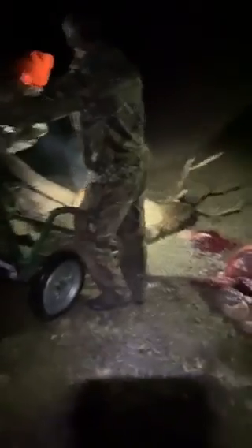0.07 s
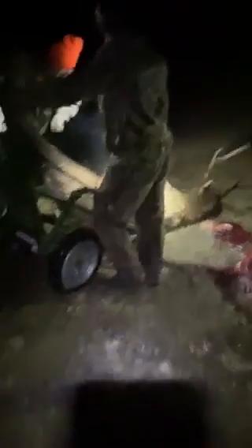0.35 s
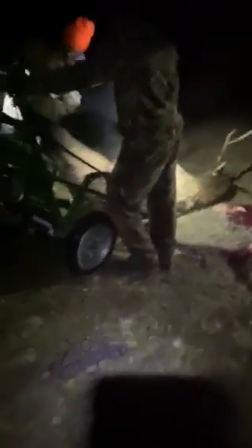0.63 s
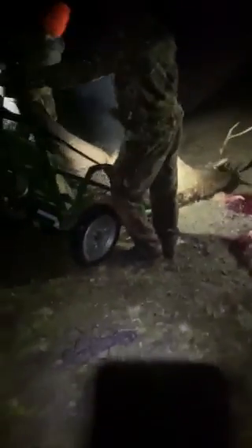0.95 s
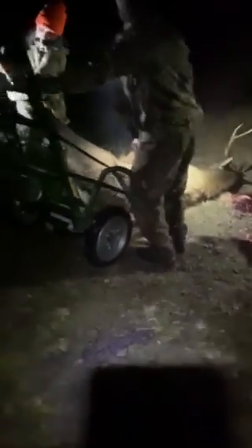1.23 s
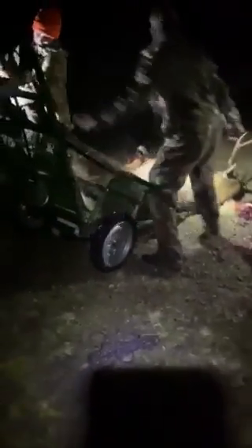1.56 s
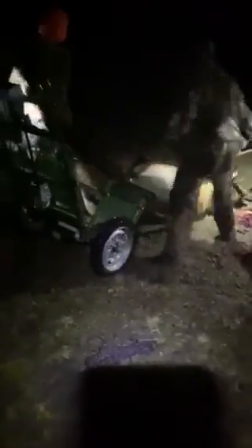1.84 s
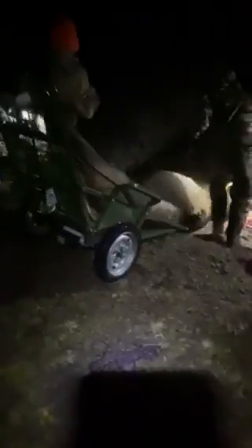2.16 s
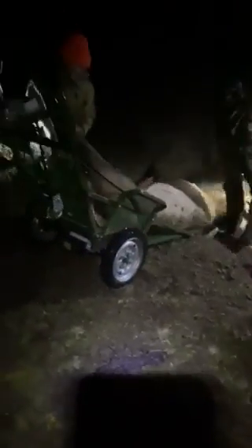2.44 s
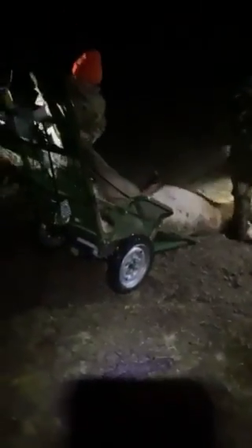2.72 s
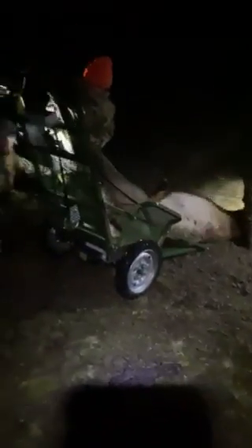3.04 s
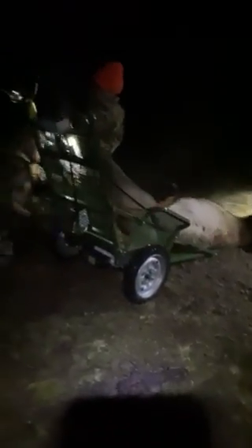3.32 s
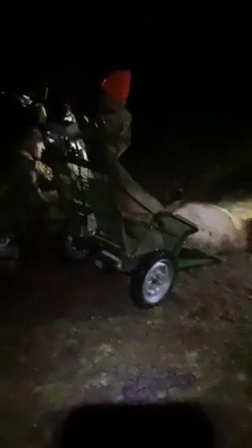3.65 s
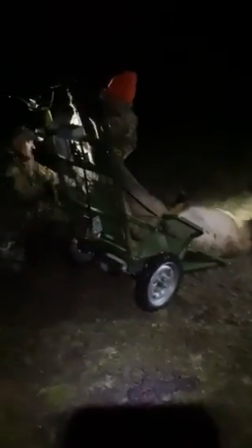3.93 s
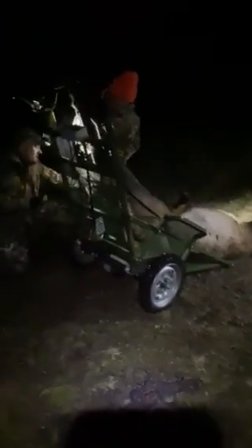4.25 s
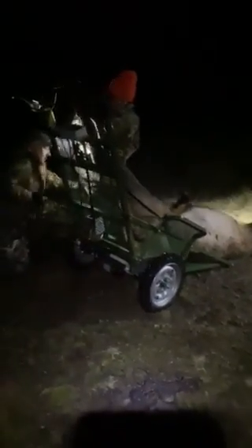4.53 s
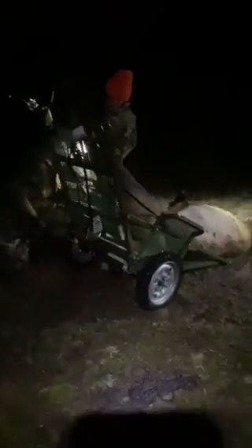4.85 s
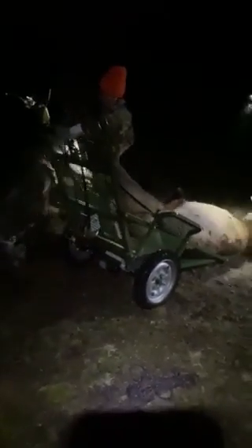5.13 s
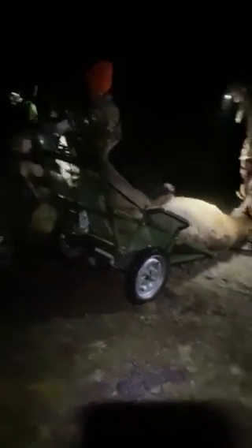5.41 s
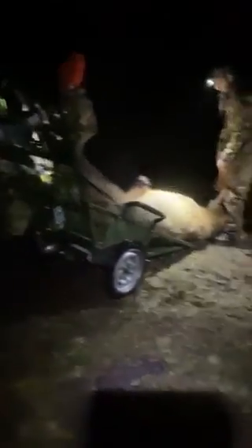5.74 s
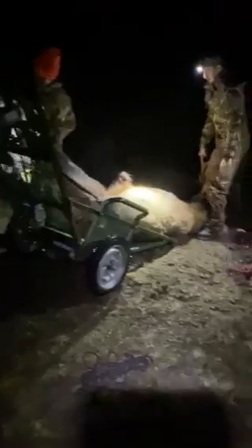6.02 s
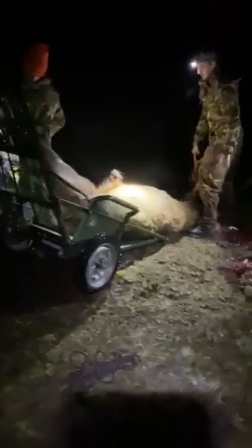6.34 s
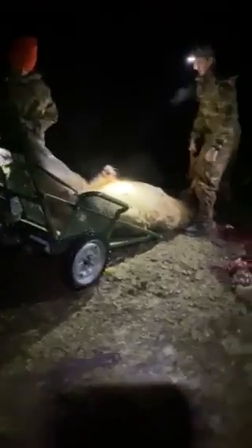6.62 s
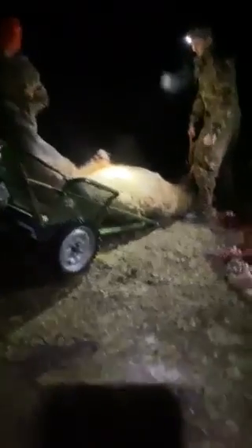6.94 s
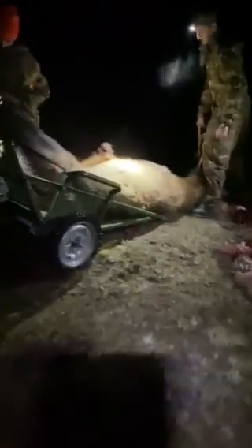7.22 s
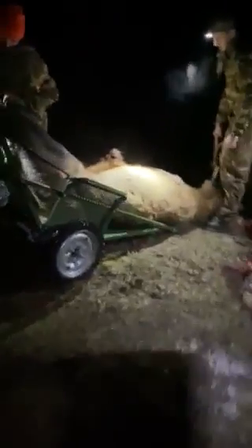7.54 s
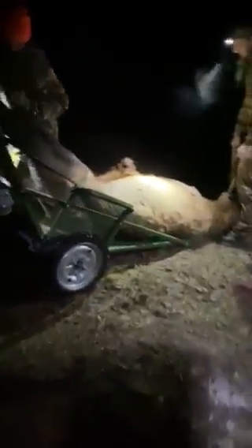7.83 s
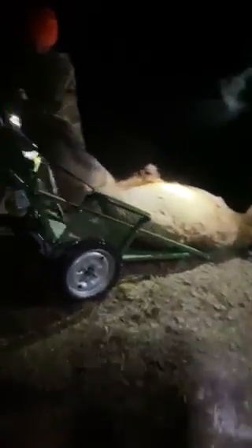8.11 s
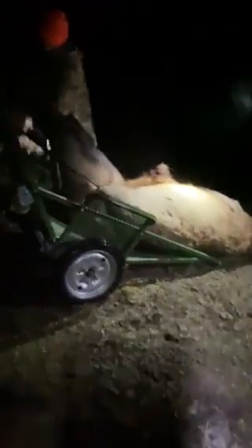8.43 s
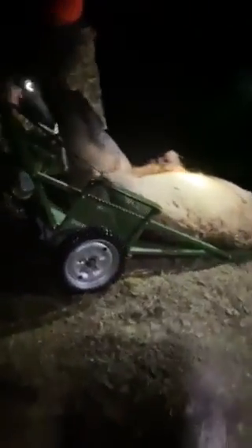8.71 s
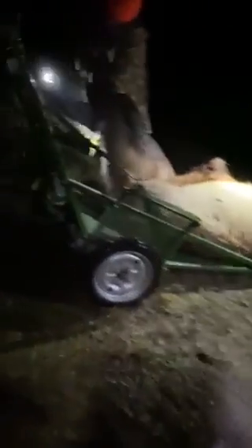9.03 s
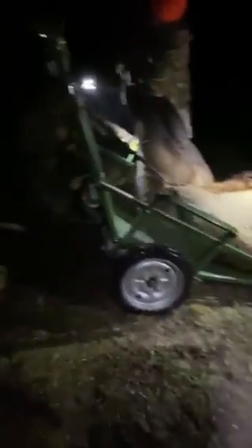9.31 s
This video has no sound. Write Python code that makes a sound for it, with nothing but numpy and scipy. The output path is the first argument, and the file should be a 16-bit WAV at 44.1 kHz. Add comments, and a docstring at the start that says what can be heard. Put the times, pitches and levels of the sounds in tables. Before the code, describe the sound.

A hand winch is cranked outdoors, its ratchet ticking and gears grinding, with a sharp, ringing steel clack on each turn.

```python
"""A hand winch on a steel loading frame hauls a heavy load off the dirt, outdoors at night.
Faint rumble and hiss run throughout; boots bump and scuff first. From 0.46 s come six crank turns.
Each starts with a pull: the pawl ticks over the ratchet while the gears grind and knock.
One hard clack sets the frame booming, then the crank swings back in quickening ticks.
In and between turns the cable creaks, the load shifts, and boots and load scuff the ground."""
import sys
import numpy as np
from scipy import signal
from scipy.io import wavfile
from scipy.ndimage import uniform_filter1d, map_coordinates

SR = 44100
rng = np.random.default_rng(int(sys.argv[2]) if len(sys.argv) > 2 else 0)


def store_pcm(level_fs):
    """Save levels as 16-bit WAV."""
    pcm = np.round(np.clip(level_fs, -1, 1) * 32767).astype(np.int16)
    wavfile.write(sys.argv[1], SR, np.atleast_2d(pcm).T)


N = 413216
TIME = np.arange(N) / SR
RING_TIME = TIME[:SR]
DRUM_DETUNE = .035  # relative pitch spread between contacts

# Steel frame modes: pitch_hz, level_db, t60_s
FRAME_MODES = [(168, -2.5, .3), (179.4, -6.5, 0.64), (194.2, -7.5, 0.97), (206.7, -1, 0.29),
               (224.6, -4.5, 0.18), (250.5, -4, 0.57), (284.6, -1, 0.33), (304, -1, 0.51), (335, -15, 0.38),
               (534, -20, 0.43), (659, -11.5, .32), (691, -9, 0.39), (716, -8.5, .3), (744, -17.5, 0.22),
               (830, 2.5, 0.24), (923, -14.5, 0.22), (981, 2.5, 0.06), (1060, -11, 0.11),
               (1156, -19.5, 0.51), (1216, -6, .18), (1269, 2.5, 0.13), (1480, -2.5, 0.14),
               (1615, -14.5, 0.29), (2074, -3, 0.12), (2182, 0.5, .1), (2341, 1, 0.14), (2580, -1, 0.11),
               (2560, -5.5, .12), (5770, -15, .13), (6100, -14.5, .13), (6850, -11, .08)]
# Gear wheel and drum modes: pitch_hz, level_db, t60_s
DRUM_MODES = [(653, -3.5, 0.1), (831, -5, 0.076), (1024, -2, .06), (1190, 1, 0.028), (1513, -4, 0.028),
              (1750, -6, .08), (2070, 5.5, 0.03), (2360, 0, 0.056), (2495, -9.5, .06), (3626, -4, 0.04),
              (4090, -8.5, 0.062)]
# Noise spectra: freq_hz, density_db
RUMBLE_SPECTRUM = [(20, -46.5), (45, 0.5), (75, 3), (130, -2), (230, 2.5), (400, -15), (700, -11.5),
                   (1300, -38), (3000, -48.5)]
HISS_SPECTRUM = [(300, 6), (1000, 0.5), (2200, 4.5), (3500, -0.5), (4700, 5.5), (6000, 3.5), (8000, -2.5),
                 (11000, 0), (12500, -10), (14000, -32.5)]
GRIND_SPECTRUM = [(80, -21.5), (175, 3), (260, 7), (480, 3), (750, 3), (1020, 2), (1650, -3), (2250, -2.5),
                  (2900, -9), (3700, -10), (4800, -6.5), (6200, -10.5), (10500, -14.5), (14000, -60.5)]
KNOCK_SPECTRUM = [(150, 4.5), (400, -1.5), (700, -1), (1000, -0.5), (1600, -10), (2200, -10.5),
                  (3000, -11.5), (6000, -17.5), (12000, -42)]
# Knock ring-out: freq_hz, t60_s
KNOCK_DECAY = [(200, 0.38), (1000, 0.52), (6000, 0.09)]
# Pull up to speed: start_s, tooth_count, first_gap_s, full_speed_gap_s
PULL_TIMES = [(.4575, 5, .079, .0615), (1.9737, 4, .0773, .057), (3.1855, 5, .104, .065),
              (4.8195, 2, .0795, .079), (6.511, 3, .0721, .071), (8.2259, 3, .0777, .09)]
# Pull force: first_tick_db, later_tick_db, knock_db, clunk_db, clunk_hz, plate_db, build_s,
# grind_db, rasp_db
PULL_LEVELS = [(-44, -28.5, -44.5, -49.5, 260, -41, 0.042, -48.5, -49.5),
               (-30.5, -26, -37.5, -47.5, 470, -41, 0.043, -46, -55),
               (-40, -29.5, -38.5, -55, 420, -42, 0.2, -53, -60),
               (-31.5, -29.5, -42.5, -62, 140, -44, 0.11, -66, -62),
               (-34.5, -30, -39.5, -62, 174, -42, 0.085, -56, -55.5),
               (-37, -34, -45, -50, 170, -40, 0.023, -54.5, -58)]
# Clack ending each pull: start_s, crack_db, boom_db, clang_db, jolt_hz
CLACK_HITS = [(0.792, -13.5, -24.5, -24.5, 244), (2.2381, -15, -25.5, -26, 238),
              (3.546, -14.5, -25, -24.5, 284), (5.2045, -23, -31.5, -33, 283), (6.83, -24, -32, -35.5, 292),
              (8.5819, -27.5, -32, -36.5, 265)]
# Swing back: start_s, tooth_count, first_gap_s, gap_loss_per_tooth_s
SWING_TIMES = [(1.0547, 4, .1144, .0215), (2.3782, 5, .1354, .0247), (3.6425, 4, .1435, .022),
               (5.4254, 4, .124, .0221), (6.9875, 5, .1297, .0224), (8.7745, 4, .1255, .0255)]
# Swing force: first_tick_db, last_tick_db, last_knock_db, last_clunk_db, clunk_hz, first_plate_db,
# last_plate_db, grind_db, rasp_db
SWING_LEVELS = [(-36.5, -25.5, -45.5, -65, 720, -44.5, -39, -48, -59),
                (-39.5, -27.5, -34, -32.5, 186.5, -42.5, -37.5, -49.5, -57.5),
                (-38, -34, -38, -44.5, 1007, -49, -42.5, -54.5, -58.5),
                (-44.5, -28.5, -34, -38.5, 1010, -43.5, -45, -59, -57.5),
                (-43.5, -30.5, -62, -45, 130, -41.5, -43, -51, -54.5),
                (-43, -27, -35, -35, 200, -41, -40, -55.5, -55.5)]


def from_db(db):
    """Decibels to gain."""
    return 10 ** (np.asarray(db) / 20)


def rms_one(x):
    """Scale to rms 1."""
    return x / np.sqrt(np.mean(x ** 2) + 1e-20)


def unit_blow(x):
    """Scale to the energy of 10 ms at rms 1."""
    return rms_one(x) * np.sqrt(.01 * SR / x.shape[-1])


def in_time(rows):
    """Level curves, sample by sample."""
    times_s, *columns = np.transpose(rows)
    return [np.interp(TIME, times_s, column) for column in columns]


def at_hz(points, hz):
    """Read a table on a log-frequency axis."""
    freqs_hz, values = np.transpose(points)
    return np.interp(np.log(hz), np.log(freqs_hz), values)


def add(out, start_s, level_db, sound):
    """Mix a sound in."""
    start = max(0, round(start_s * SR))
    out[:, start:start + sound.shape[-1]] += from_db(level_db) * sound[..., :N - start]


def flutter(rate_hz):
    """Random wavering, mostly slower than rate_hz; rms 1."""
    return rms_one(uniform_filter1d(rng.standard_normal(N), size=SR // rate_hz))


def sides(hz):
    """Left and right gains at a frequency."""
    # Stereo balance: freq_hz, left_minus_right_db
    balance = [(40, -.5), (150, -2.6), (500, -3.5), (1000, -2), (2200, -2.6), (5000, -1), (9000, 0)]
    return from_db(at_hz(balance, hz) * np.array([[.5], [-.5]]))


def noise_bands(spectrum, size):
    """Yield (centre_hz, band): third octaves of stereo noise under a spectrum."""
    # Left-right likeness: freq_hz, correlation
    likeness = [(60, .96), (200, .995), (1400, .97), (3100, .62), (7000, .85), (12000, .92)]
    edges_hz = 22 * 2 ** (np.arange(30) / 3)
    white = rng.standard_normal((2, 2, size + 2000))
    for k, (low_hz, high_hz) in enumerate(zip(edges_hz, edges_hz[1:])):
        hz = np.sqrt(low_hz * high_hz)
        if spectrum[0][0] / 2 < hz < spectrum[-1][0] * np.sqrt(2):
            bandpass = signal.butter(2, [low_hz, high_hz], "band", fs=SR, output="sos")
            mid, side = signal.sosfilt(bandpass, white[k % 2])[:, -size:]
            alike = at_hz(likeness, hz)
            pair = np.sqrt(1 + alike) * mid + np.sqrt(1 - alike) * side * [[1], [-1]]
            yield hz, pair * sides(hz) * from_db(at_hz(spectrum, hz))


def colour(spectrum):
    """Steady stereo noise, rms 1."""
    return rms_one(sum(band for _, band in noise_bands(spectrum, N)))


def burst(spectrum, decay, rise_s, late_cycles, tail_db, tail_s, uneven_db=0):
    """Dense modes dying band by band; lows arrive later, a weak scattered tail follows."""
    t, out = TIME[:SR // 3], 0
    for hz, band in noise_bands(spectrum, len(t)):
        age_s = np.maximum(t - late_cycles / hz, 0)
        rise = np.minimum(age_s / rise_s, 1)
        fall = from_db(-60 * age_s / at_hz(decay, hz)) + from_db(tail_db - 60 * age_s / tail_s)
        out = out + band * rise * fall * from_db(uneven_db * rng.standard_normal())
    return unit_blow(out)


def ring(modes, rise_s, scatter_db, detune=0):
    """Struck modes, neighbours in opposite phase; no two blows hit the same spot."""
    t, out = RING_TIME[RING_TIME < 2 * max(t60_s for *_, t60_s in modes)], 0
    for k, (hz, level_db, t60_s) in enumerate(modes):
        strength = (-1) ** k * from_db(level_db + scatter_db * rng.standard_normal())
        hz = hz * np.exp(detune * rng.standard_normal())
        out = out + strength * sides(hz) * np.sin(2 * np.pi * hz * t) * from_db(-60 * t / t60_s)
    return unit_blow(out * np.minimum(t / rise_s, 1))


def note(hz, swell_s):
    """Heavily damped tone, peaking at swell_s."""
    t = RING_TIME[RING_TIME < 20 * swell_s]
    return sides(hz) * t / swell_s * np.exp(1 - t / swell_s) * np.sin(2 * np.pi * hz * t)


def softened(blow, cutoff_hz):
    """A gentler contact lasts longer and loses treble."""
    pole = np.exp(-2 * np.pi * cutoff_hz / SR)
    return unit_blow(signal.lfilter([1], [1, -pole], blow))


def night():
    """Low rumble, uneven rustle and thin hiss, all slowly wavering."""
    # Background rumble: time_s, level_db
    rumble_curve = [(0.0, -56), (0.31, -69), (2.71, -60.5), (3.21, -69.5), (3.55, -59.5), (4.54, -70),
                    (5.3, -62), (6.42, -74), (6.73, -61), (7.67, -61.5), (7.98, -76), (8.32, -57.5),
                    (8.61, -67), (9.37, -52.5)]
    # Rustle and hiss, one list per pause between turns: time_s, rustle_db, hiss_db
    air_curves = [
        [(0.0, -57.5, -79), (0.2, -66.5, -71.5), (0.43, -61, -77)],
        [(1.45, -66.5, -69), (1.55, -63, -68), (1.73, -54, -70)],
        [(2.84, -57.5, -71.5), (2.914, -80, -74.5), (3.202, -80, -77.5), (3.27, -74.5, -71.5)],
        [(4.15, -64, -73), (4.35, -67.5, -70.5), (4.554, -64.5, -71), (4.79, -63.5, -71.5)],
        [(5.83, -61.5, -80), (5.976, -71, -79.5), (6.28, -64, -87), (6.48, -59.5, -74)],
        [(7.58, -62, -70.5), (7.826, -63, -69), (8.09, -64, -70)],
    ]
    rumble_db, = in_time(rumble_curve)
    rustle_db, hiss_db = in_time(np.vstack(air_curves))
    flicker_db = 3.7 * flutter(rate_hz=40)
    rumble = from_db(rumble_db + 3) * colour(RUMBLE_SPECTRUM)
    rustle = from_db(rustle_db - 2 + flicker_db) * colour(GRIND_SPECTRUM)
    return rumble + rustle + from_db(hiss_db + 5.5) * colour(HISS_SPECTRUM)


def scuffs():
    """A boot or the load drags over dirt: grainy rasp, hiss on top."""
    # Drags: start_s, length_s, rasp_db, hiss_db
    drags = [(0.088, 0.15, -68, -64), (1.757, 0.18, -51.5, -59), (2.114, 0.046, -43.5, -49),
             (4.979, 0.18, -55.5, -81), (6.455, 0.073, -65, -80), (7.492, 0.046, -53.5, -79),
             (7.614, 0.15, -63, -66), (8.123, 0.2, -65, -60.5)]
    rise_s, fall_s = .0085, .011
    rasp_gain, hiss_gain = np.zeros((2, N))
    for start_s, length_s, rasp_db, hiss_db in drags:
        age_s = TIME - start_s
        shape = np.clip(age_s / rise_s, 0, 1) * np.exp(-np.maximum(age_s - length_s, 0) / fall_s)
        rasp_gain += from_db(rasp_db) * shape
        hiss_gain += from_db(hiss_db - .5) * shape
    grain = from_db(3.2 * flutter(rate_hz=200))
    return grain * (rasp_gain * colour(GRIND_SPECTRUM) + hiss_gain * colour(HISS_SPECTRUM))


def ground_wave(drop_hz, end_hz, glide_s, decay_s):
    """Wave through hard ground: highs arrive first, so the pitch sinks. Tuning varies per blow."""
    hz = (end_hz + drop_hz * np.exp(-RING_TIME / glide_s)) * from_db(rng.standard_normal())
    wave = np.sin(2 * np.pi * np.cumsum(hz) / SR) * np.exp(-RING_TIME / decay_s)
    return unit_blow(sides(end_hz) * wave)


def footsteps():
    """Heel, then sole, thuds on the ground; grit snaps underfoot with a dry pop."""
    # Boot landings: start_s, heel_snap_db, sole_snap_db, thud_db, snap_hz
    steps = [(0.03, -61, -62, -58, 1360), (0.182, -58, -65, -51.5, 1300), (1.776, -37, -28, -53.5, 2430),
             (1.843, -34, -19.5, -36.5, 2240), (2.888, -52, -54, -49.5, 1460), (4.428, -69, -54, -57, 1450),
             (4.804, -49, -65, -51, 1440), (5.074, -53, -41, -38, 1480), (6.176, -58, -70, -60.5, 1610),
             (6.419, -39.5, -61, -48, 2560), (7.488, -43, -34.5, -54, 1810), (8.107, -33, -52, -40, 2340),
             (9.232, -23, -23, -52, 2370), (9.316, -36.5, -59, -52, 2220)]
    # Stones cracking: start_s, level_db, pitch_hz
    stones = [(1.789, -32, 1790), (1.805, -32, 2720), (1.842, -32, 1390), (1.8465, -31, 1480),
              (1.847, -28, 3130), (1.858, -23, 3230), (1.8585, -32, 1800), (2.077, -25.5, 1480),
              (5.081, -26.5, 1750), (5.095, -29.5, 1100), (5.105, -41, 3650), (7.642, -43, 2200),
              (8.1085, -33, 487), (8.146, -38, 1750), (8.168, -35.5, 2000)]
    # Impact spectra: freq_hz, density_db
    thud_spectrum = [(30, -18), (70, 2.5), (130, -0.5), (220, -5), (400, 6), (900, -34)]
    pop_spectrum = [(200, 3.5), (600, -1.5), (1100, -2.5), (1700, 4), (2400, -4.5), (3300, -7.5),
                    (5000, -9.5), (9000, -22), (15000, -30)]
    # Ground ring-out: freq_hz, t60_s
    decay = [(70, 0.31), (250, 0.039), (1000, 0.026), (8000, 0.039)]
    sole_delay_s = .0245
    out, snaps = np.zeros((2, N)), list(stones)
    thuds = [burst(thud_spectrum, decay, rise_s=.0017, late_cycles=.86, tail_db=-11, tail_s=.41)
             for _ in range(5)]
    pops = [burst(pop_spectrum, decay, rise_s=.0001, late_cycles=.94, tail_db=-11.5, tail_s=.15,
                  uneven_db=2.5) for _ in range(6)]
    for k, (start_s, heel_db, sole_db, thud_db, snap_hz) in enumerate(steps):
        snaps += [(start_s, heel_db, snap_hz), (start_s + sole_delay_s, sole_db, snap_hz)]
        add(out, start_s, thud_db - 1, thuds[k % len(thuds)])
        add(out, start_s + sole_delay_s, thud_db - 31, thuds[k % len(thuds) - 1])
        wave = ground_wave(drop_hz=611, end_hz=66.6, glide_s=.00369, decay_s=.024)
        add(out, start_s + .0012, thud_db - .5, wave)
    for k, (start_s, level_db, pitch_hz) in enumerate(snaps):
        add(out, start_s, level_db - 6, note(pitch_hz, swell_s=.0006))
        add(out, start_s, level_db - 16.5, pops[k % len(pops)])
    return out


def load_shifts():
    """The load shifts on the frame with soft blows; the two deep ones near 1.85 s are a boot sole landing."""
    # Blows: start_s, level_db, pitch_hz
    blows = [(1.288, -40.5, 630), (1.851, -31.5, 86), (1.878, -30.5, 116), (2.316, -38, 285),
             (3.386, -31.5, 264), (3.462, -34, 255), (5.158, -44, 231), (6.005, -55.5, 710),
             (7.507, -41, 126), (6.425, -42, 125), (8.194, -41.5, 130.3), (8.345, -47, 175),
             (9.331, -39.5, 196)]
    out = np.zeros((2, N))
    for start_s, level_db, pitch_hz in blows:
        knock = burst(KNOCK_SPECTRUM, KNOCK_DECAY, rise_s=.003, late_cycles=.13, tail_db=-25, tail_s=.23)
        add(out, start_s, level_db - 3, note(pitch_hz, swell_s=.0057))
        add(out, start_s, level_db - 11, knock)
    return out


def cable_creaks():
    """The cable beds in by stick-slip: uneven runs of dry snaps that also ring the drum."""
    # Creaks: start_s, length_s, level_db, centre_hz
    creaks = [(1.283, .028, -42, 830), (1.884, .024, -43.5, 880), (2.009, .02, -43, 1900),
              (2.12, 0.026, -46.5, 1500), (2.173, 0.02, -44.5, 1100), (3.324, .025, -48.5, 1990),
              (4.925, .04, -49, 1030), (5.008, 0.023, -52, 1300), (5.689, 0.018, -44.5, 1070),
              (6.495, 0.076, -53, 1750), (6.618, 0.0083, -45, 1100), (6.688, 0.015, -51, 2200),
              (6.73, .008, -59, 1800), (7.492, 0.025, -48, 1190), (7.638, 0.032, -55.5, 2600),
              (8.293, .01, -48, 1300), (8.334, 0.015, -50, 2300), (8.435, 0.018, -59, 1900),
              (9.098, 0.016, -50, 1600)]
    gap_s, spread_db, drum_db = .002, 4, -8
    out = np.zeros((2, N))
    for start_s, length_s, level_db, centre_hz in creaks:
        slips, count = np.zeros((1, SR // 4)), max(2, round(length_s / gap_s))
        slip_s = (np.arange(count) + rng.random(count)) * gap_s
        sizes = from_db(spread_db * rng.standard_normal(count)) * rng.choice([-1, 1], count)
        slips[0, (slip_s * SR).astype(int)] = sizes
        drum_ring = ring(DRUM_MODES, rise_s=.0005, scatter_db=4.5, detune=DRUM_DETUNE)
        drum = signal.fftconvolve(slips, drum_ring, axes=1)[:, :slips.size]
        snaps = sides(centre_hz) * rms_one(slips) + from_db(drum_db) * rms_one(drum)
        creak = signal.lfilter(*signal.iirpeak(centre_hz, Q=1.3, fs=SR), snaps)
        creak = signal.sosfilt(signal.butter(2, 2 * centre_hz, fs=SR, output="sos"), creak)
        add(out, start_s, level_db, rms_one(creak) * np.sqrt(length_s * SR / slips.size))
    return out


def pull(timing, force):
    """Teeth of a pull; each closes 3/4 of the way to the full-speed gap."""
    start_s, count, first_gap_s, fast_gap_s = timing
    first_db, later_db, knock_db, clunk_db, clunk_hz, plate_db, *_ = force
    k = np.arange(count)
    gaps_s = fast_gap_s + (first_gap_s - fast_gap_s) * .25 ** k
    times_s = start_s + np.cumsum(gaps_s) - gaps_s
    tick_db = np.where(k, later_db, first_db)
    return np.transpose(np.broadcast_arrays(
        times_s, gaps_s, tick_db, plate_db, knock_db, clunk_db, clunk_hz))


def swing_back(timing, force):
    """Teeth of a swing back, each sooner and harder than the last."""
    start_s, count, first_gap_s, gap_loss_s = timing
    first_db, last_db, knock_db, clunk_db, clunk_hz, first_plate_db, last_plate_db, *_ = force
    k = np.arange(count)
    gaps_s = first_gap_s - gap_loss_s * k
    times_s = start_s + np.cumsum(gaps_s) - gaps_s
    tick_db = np.linspace(first_db, last_db, count)
    plate_db = np.linspace(first_plate_db, last_plate_db, count)
    softer_db = 6.5 * k[::-1]
    return np.transpose(np.broadcast_arrays(
        times_s, gaps_s, tick_db, plate_db, knock_db - softer_db, clunk_db - softer_db, clunk_hz))


def teeth():
    """Every tooth passing the pawl: start_s, gap_s, tick_db, plate_db, knock_db, clunk_db, clunk_hz."""
    return np.vstack([*map(pull, PULL_TIMES, PULL_LEVELS), *map(swing_back, SWING_TIMES, SWING_LEVELS)])


def effort():
    """Grind and rasp gains: a pull builds and holds nearly to the clack; a swing peaks at its end."""
    attack_db_per_s, release_db_per_s, ease_s = 145, 77, .035
    swell_db_per_s, fade_db_per_s, hold_s = 47.5, 117, .01
    t, gains = TIME[::SR // 500], 0
    for (start_s, *_), force, (clack_s, *_) in zip(PULL_TIMES, PULL_LEVELS, CLACK_HITS):
        *_, build_s, grind_db, rasp_db = force
        attack_db = attack_db_per_s * np.minimum(t - start_s, 0)
        build_db = -8.5 * np.clip(1 - (t - start_s) / build_s, 0, 1)
        release_db = release_db_per_s * np.minimum(clack_s - ease_s - t, 0)
        gains += np.outer(from_db([grind_db, rasp_db]), from_db(attack_db + build_db + release_db))
    for timing, force in zip(SWING_TIMES, SWING_LEVELS):
        *_, grind_db, rasp_db = force
        past_peak_s = t - swing_back(timing, force)[-1, 0] - hold_s
        swell_db = np.minimum(swell_db_per_s * past_peak_s, -fade_db_per_s * past_peak_s)
        gains += np.outer(from_db([grind_db, rasp_db]), from_db(swell_db))
    return [np.interp(TIME, t, gain) for gain in gains]


def drum_rasp():
    """Tiny uneven slips at several drum spots, each ringing differently; rms 1."""
    spots, slips_per_s, spread_db = 5, 330, 6.5
    sizes = from_db(spread_db * np.minimum(rng.exponential(1, N), 3)) * rng.choice([-1, 1], N)
    slips = (rng.random(N) < slips_per_s / SR) * sizes
    spot, out = rng.integers(0, spots, N), 0
    for k in range(spots):
        drum = ring(DRUM_MODES, rise_s=.0003, scatter_db=3, detune=DRUM_DETUNE)
        out += signal.oaconvolve([slips * (spot == k)], drum, axes=1)[:, :N]
    return rms_one(out)


def gears():
    """Loaded teeth stick and slip, knocking between ticks; the frame shudders and clunks."""
    grind_gain, rasp_gain = effort()
    stick_slip_db = 2.37 * flutter(rate_hz=120)
    grind = from_db(stick_slip_db - 2.5) * colour(GRIND_SPECTRUM)
    shudder = from_db(-9.5) * colour(RUMBLE_SPECTRUM)
    out = grind_gain * (grind + shudder) + rasp_gain * drum_rasp()
    knocks = [burst(KNOCK_SPECTRUM, KNOCK_DECAY, rise_s=.0013, late_cycles=.2, tail_db=-27, tail_s=.2)
              for _ in range(10)]
    for k, (tooth_s, gap_s, _, _, knock_db, clunk_db, clunk_hz) in enumerate(teeth()):
        knock_s = tooth_s + .46 * gap_s
        drum = ring(DRUM_MODES, rise_s=.0012, scatter_db=3.5, detune=DRUM_DETUNE)
        add(out, knock_s, knock_db - 9.5, knocks[k % len(knocks)])
        add(out, knock_s, knock_db - 12.5, drum)
        add(out, knock_s - .003, clunk_db - 2, note(clunk_hz, swell_s=.0051))
        add(out, knock_s, clunk_db - 12.5, note(clunk_hz, swell_s=.015))  # frame hums on
    return out


def ratchet():
    """The sprung pawl snaps onto each tooth and bounces once; plate and frame ring faintly."""
    # Pawl tick: freq_hz, density_db
    spectrum = [(300, -11.5), (700, -12.5), (1050, -4), (1650, -14), (2200, -5.5), (2900, -9), (3800, -2),
                (4700, 3.5), (5600, -2.5), (7000, 6), (8500, -17.5), (11000, -5.5), (13000, -33.5),
                (16000, -22)]
    # Tick ring-out: freq_hz, t60_s
    decay = [(500, 0.16), (2000, 0.18), (6000, 0.041), (12000, 0.094)]
    # Winch plate modes: pitch_hz, level_db, t60_s
    plate_modes = [(826, -20, 0.042), (1003, -5.5, 0.093), (1033, 6, 0.028), (1266, -6.5, 0.051),
                   (1480, -3, 0.032), (1780, -9, 0.066), (1974, 4, 0.02), (2252, 3, 0.041),
                   (2476, -6, 0.022), (3370, 9.5, 0.0079), (3750, -2.5, 0.029), (5420, -3.5, 0.018),
                   (5400, -21, 0.018)]
    # Extra pawl ticks, soft last teeth and rattles: start_s, tick_db, plate_db
    rattles = [(2.2113, -32, -61), (4.090, -54, -50), (4.979, -47, -46), (5.797, -47, -44.5),
               (8.4975, -40.5, -39.5), (9.1372, -35.5, -36)]
    out = np.zeros((2, N))
    ticks = [burst(spectrum, decay, rise_s=.00053, late_cycles=.27, tail_db=-16.5, tail_s=.42,
                   uneven_db=3.5) for _ in range(14)]
    shakes = [ring(FRAME_MODES, rise_s=.067, scatter_db=3.5) for _ in range(4)]
    first_contact = 1 + 1.1 * np.exp(-TIME[:SR // 3] / .0021)
    drops = [(start_s, tick_db, plate_db) for start_s, _, tick_db, plate_db, *_ in teeth()]
    for k, (start_s, tick_db, plate_db) in enumerate(drops + list(rattles)):
        tick = softened(first_contact * ticks[k % len(ticks)], cutoff_hz=60000 * from_db(.69 * tick_db))
        bounce_s = rng.uniform(.003, .009)
        plate = ring(plate_modes, rise_s=.0036, scatter_db=3, detune=.028)
        add(out, start_s, tick_db - 10, tick)
        add(out, start_s + bounce_s, tick_db - 20.5, ticks[k % len(ticks) - 1])
        add(out, start_s + .000922, plate_db - 5, plate)
        add(out, start_s + .00394, plate_db - 11.5, shakes[k % len(shakes)])
        add(out, start_s + .0125, plate_db - 11.5, note(hz=176.2, swell_s=.025))  # load nudges frame
    return out


def clacks():
    """Steel slams on steel and rings; then the frame jolts and booms, and loose parts chatter."""
    # Impact spectra: freq_hz, density_db
    crack_spectrum = [(400, -20.5), (750, 1), (1200, -4), (1700, -4), (2300, 2), (3200, -3.5), (4700, 3),
                      (5700, -1), (6800, 10.5), (8000, -5), (11000, 2), (13000, -10), (16000, -34)]
    boom_spectrum = [(60, -46), (120, -35.5), (175, -9), (280, -4), (390, -19.5), (700, -21.5), (1500, -35)]
    # Steel ring-out: freq_hz, t60_s
    decay = [(200, 0.11), (800, 0.29), (2000, 0.12), (5000, 0.084), (12000, 0.074)]
    split_hz, chatter_gap_s, chatter_loss_db = 450, .019, 7
    low_modes = [mode for mode in FRAME_MODES if mode[0] < split_hz]
    high_modes = [mode for mode in FRAME_MODES if mode[0] >= split_hz]
    out = np.zeros((2, N))
    for start_s, crack_db, boom_db, clang_db, jolt_hz in CLACK_HITS:
        crack = burst(crack_spectrum, decay, rise_s=.0019, late_cycles=.65, tail_db=-35.5, tail_s=.42)
        clang = ring(high_modes, rise_s=.003, scatter_db=1.5)
        boom = burst(boom_spectrum, decay, rise_s=.009, late_cycles=.1, tail_db=-15.5, tail_s=.92)
        add(out, start_s, crack_db - 5, softened(crack, cutoff_hz=30000 * from_db(1.21 * crack_db)))
        add(out, start_s + .001062, clang_db + 3, clang)
        add(out, start_s + .0029, boom_db + 5.5, ring(low_modes, rise_s=.0036, scatter_db=1.5))
        add(out, start_s + .00603, boom_db + 1.5, boom)
        add(out, start_s + .0072, boom_db + 6.5, note(jolt_hz, swell_s=.0042))
        for k in range(4):
            late_s = chatter_gap_s * (k + rng.uniform(.5, 1))
            chatter = ring(DRUM_MODES, rise_s=.00077, scatter_db=1.5, detune=DRUM_DETUNE)
            add(out, start_s + late_s, clang_db - 9.5 - chatter_loss_db * k, chatter)
    return out


def scene():
    """All sources; sound reaches the left microphone port just before the right."""
    lag_s = 35e-6
    winch = clacks() + ratchet() + gears() + cable_creaks()
    left, right = winch + load_shifts() + footsteps() + scuffs() + night()
    late_right = map_coordinates(right, [np.arange(N) - lag_s * SR], order=3, mode="nearest")
    return np.array([left, late_right])


def record(dry):
    """Microphone: narrow treble dip, top cut."""
    dip_hz, dip_share, stop_hz = 4716, .66, 16800
    notched = signal.lfilter(*signal.iirnotch(dip_hz, Q=5.8, fs=SR), dry)
    coloured = dry + dip_share * (notched - dry)
    return signal.sosfilt(signal.cheby2(12, 70, stop_hz, fs=SR, output="sos"), coloured)


dry = scene()
out = record(dry)
store_pcm(out)
```